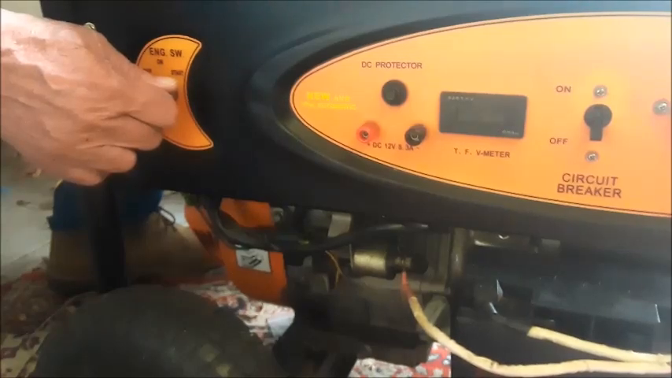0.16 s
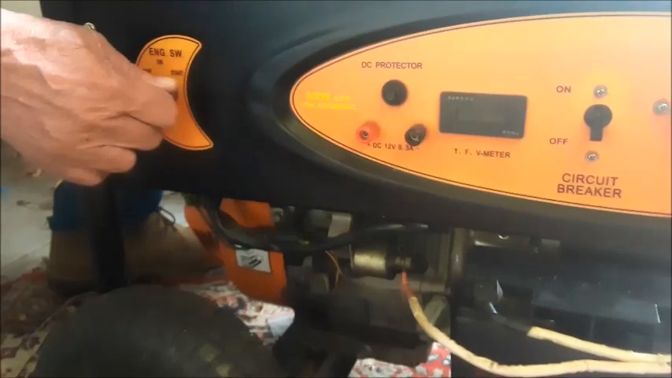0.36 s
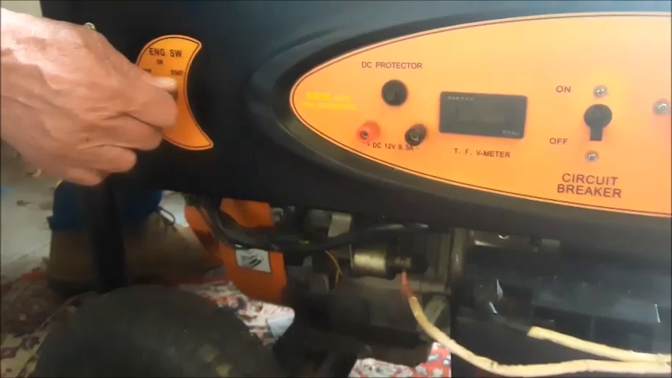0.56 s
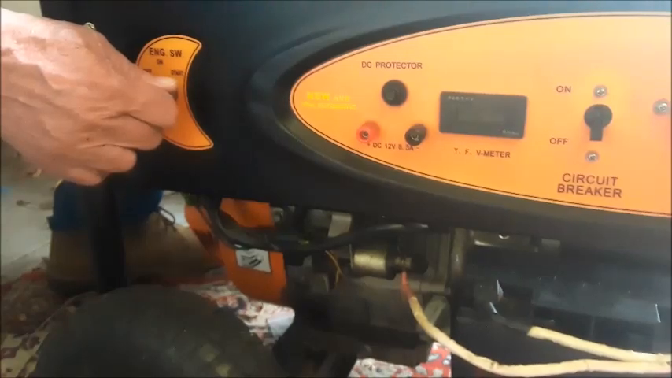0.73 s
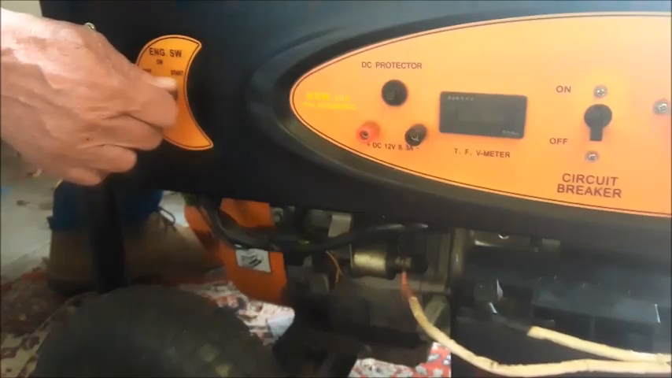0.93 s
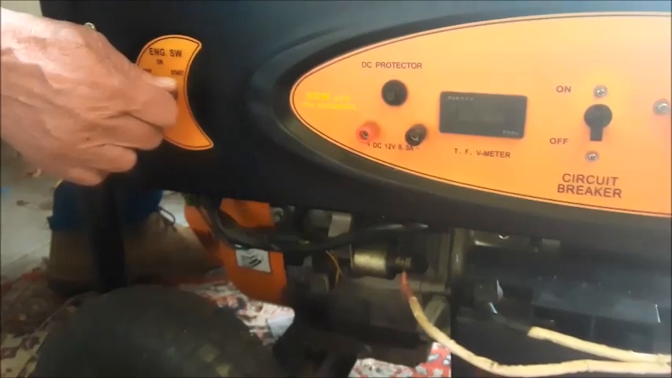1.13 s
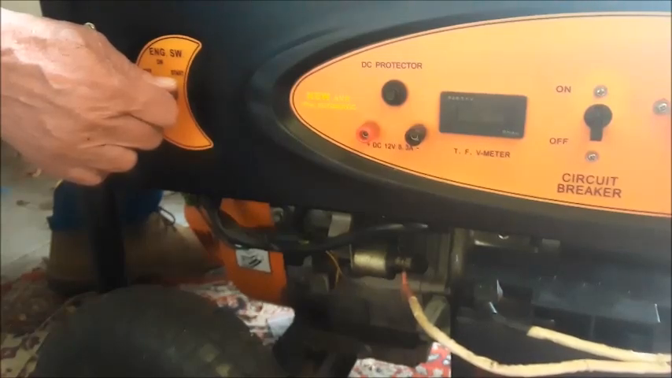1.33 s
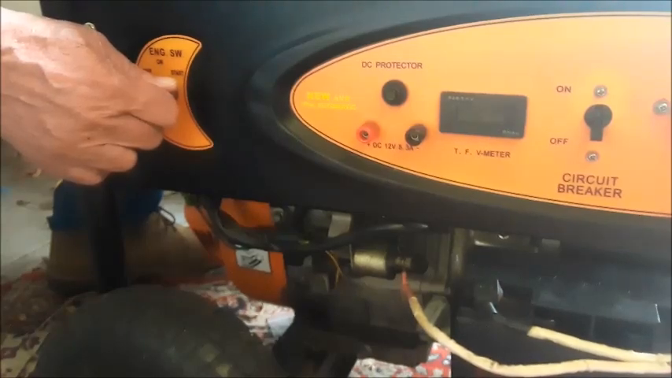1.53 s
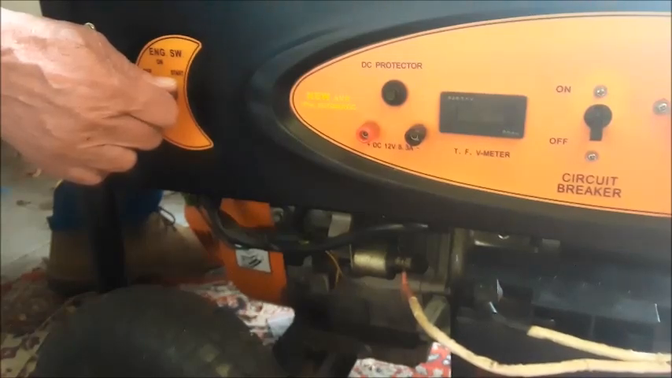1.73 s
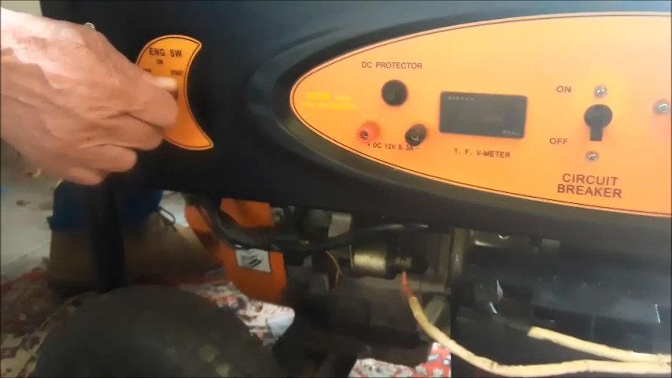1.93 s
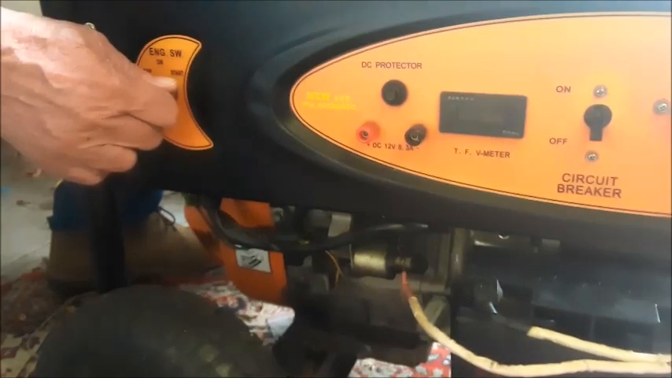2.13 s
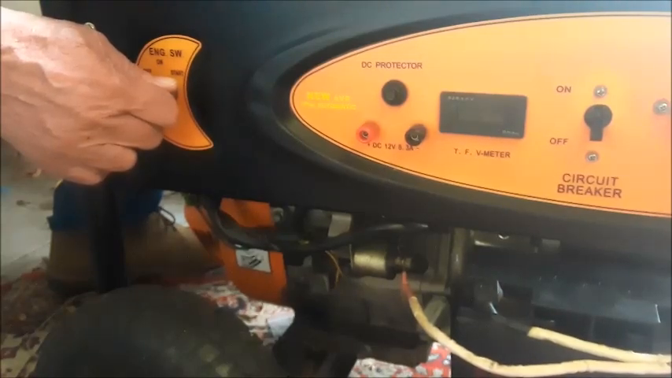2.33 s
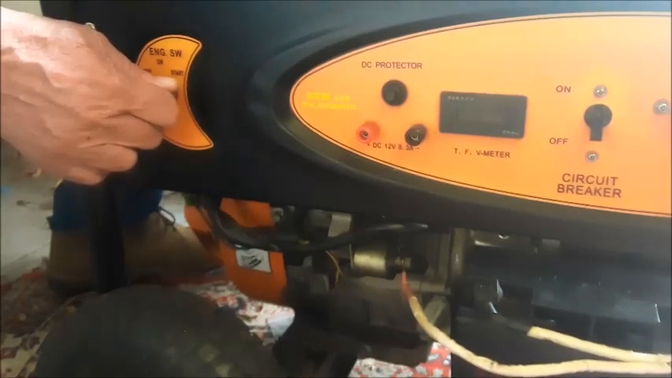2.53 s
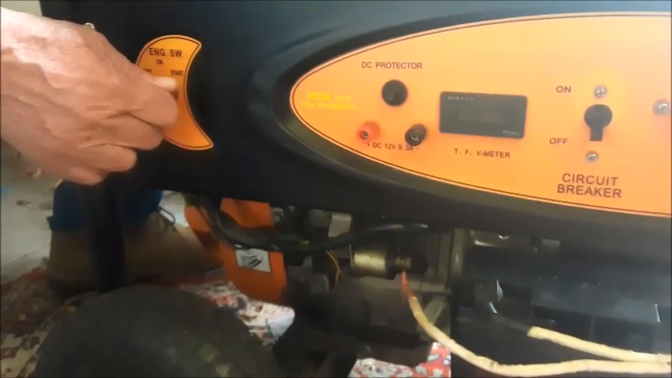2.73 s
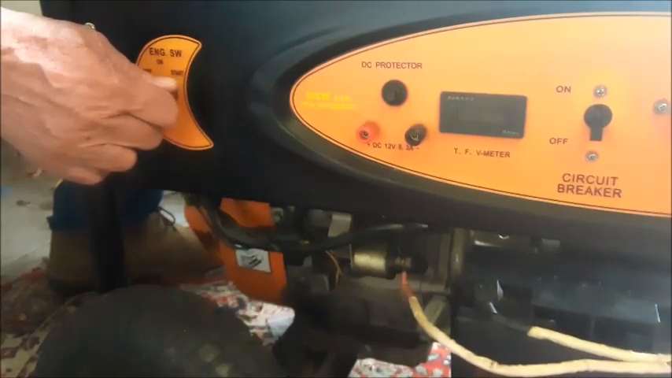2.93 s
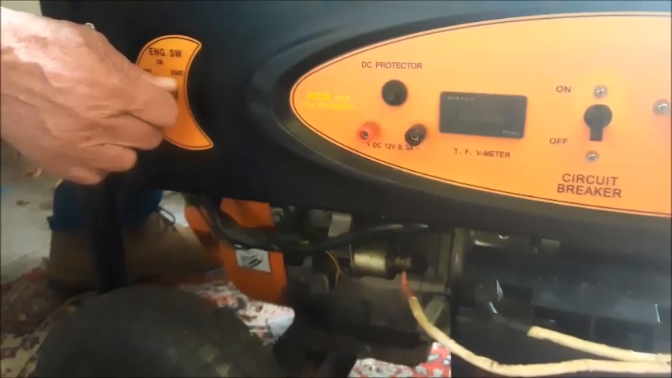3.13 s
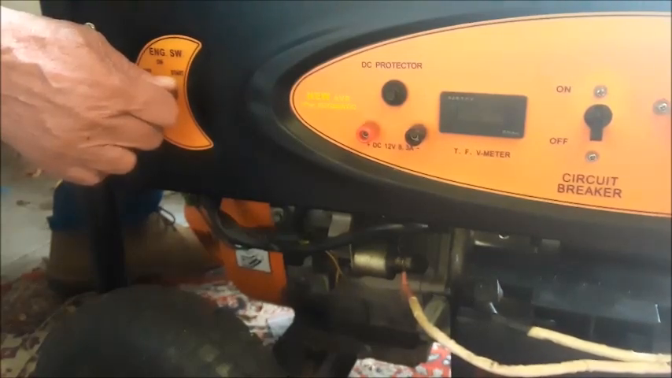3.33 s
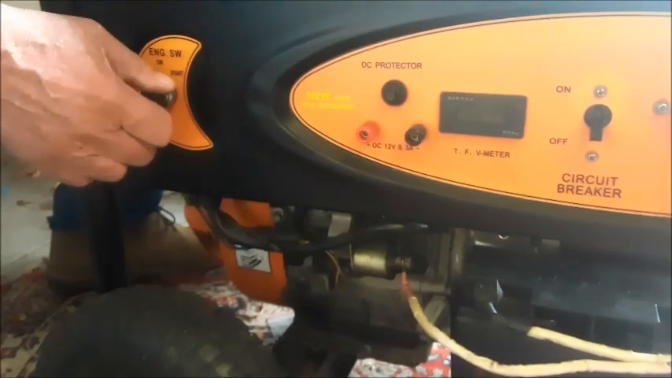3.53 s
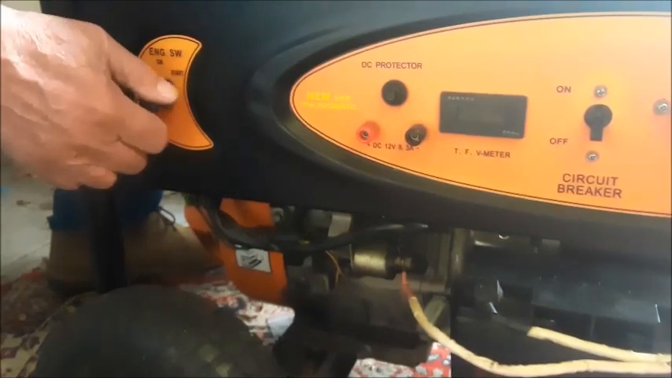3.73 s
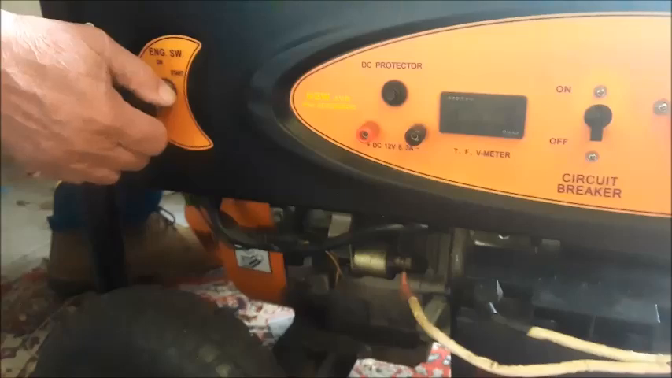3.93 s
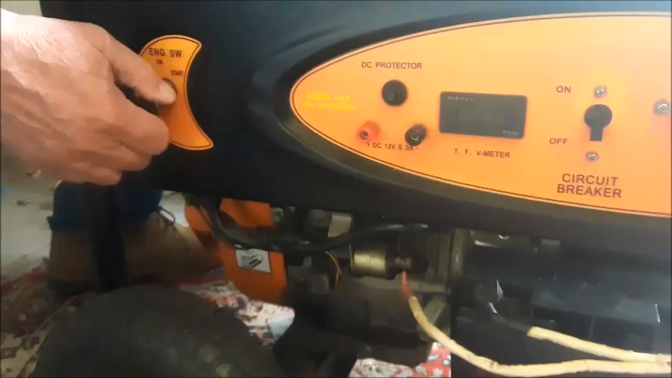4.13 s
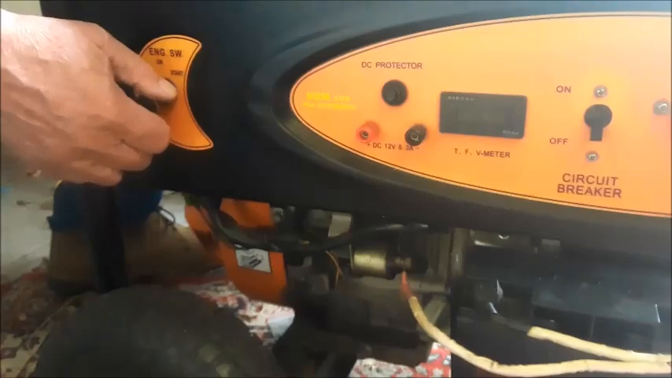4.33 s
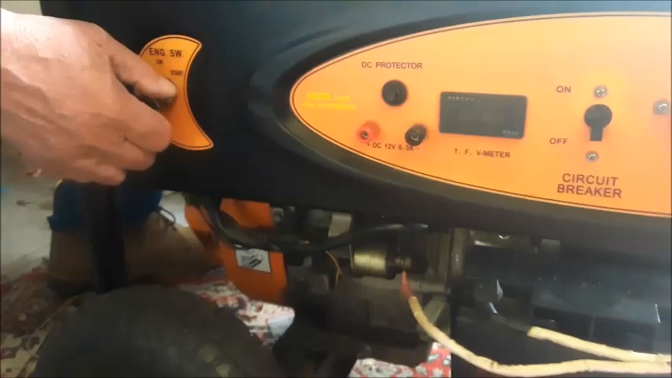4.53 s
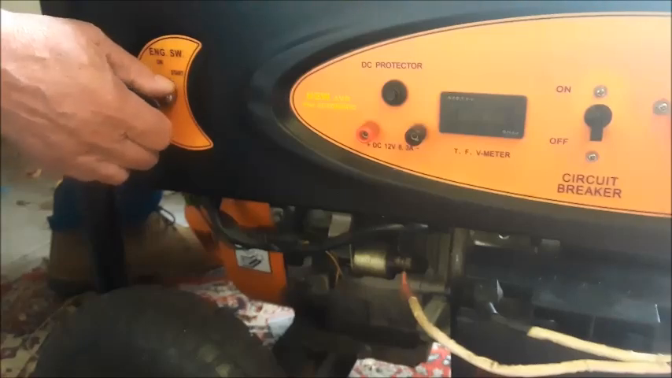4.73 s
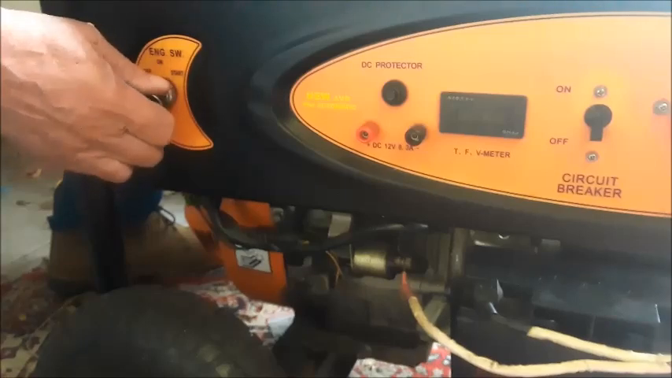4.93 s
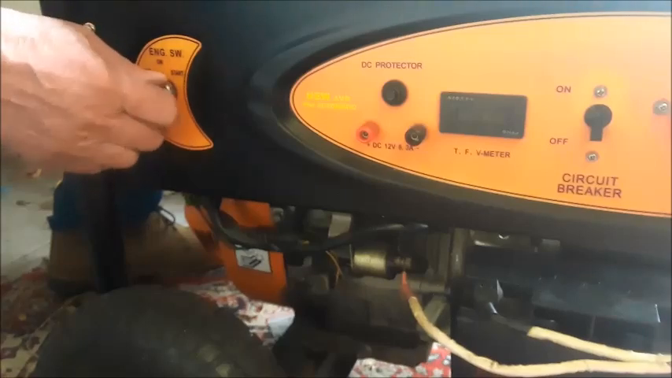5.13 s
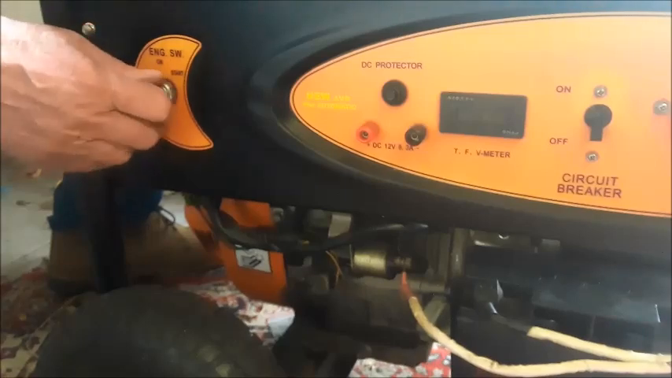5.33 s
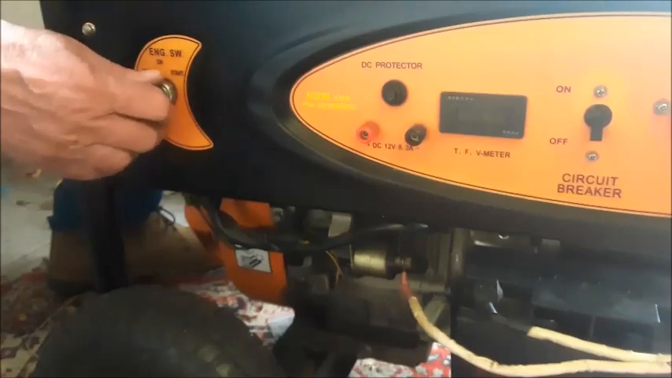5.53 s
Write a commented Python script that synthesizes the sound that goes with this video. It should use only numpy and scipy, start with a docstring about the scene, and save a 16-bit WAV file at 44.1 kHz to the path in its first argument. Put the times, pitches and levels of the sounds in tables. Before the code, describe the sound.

From the start an electric starter is already cranking a one-cylinder generator engine that does not catch. A harsh gear whine, mostly around 1.6 to 1.8 kHz with higher overtones, sags and recovers nearly four times a second as each compression brakes it. Casing and cover rattle and ring, gears grind, the frame rumbles low, and soft air thumps and small valve ticks repeat each cycle. The pace rises only slightly, and the whine's colour shifts around 1.3-2.1 s. At about 3.35 s the key lets go: a bright snap at 3.38 s, a brief sinking whir, then duller grinding and irregular short knocks, fading until about 4.2 s. Near silence follows with faint low noise. A sharp key-switch click comes at 4.76 s, tiny ticks around 5.05-5.15 s, and a stronger, fuller click at 5.61 s. The microphone is close; knocks and clicks have short tails from hard walls.

```python
"""A whining electric starter is heard first: it cranks a one-cylinder generator engine that does not catch.
The gear tones slow at each compression, over noise ringing in the casing and soft air pulses from the piston.
The key lets go, the engine clatters to rest with short knocks, and the key switch clicks twice.
One microphone listens close by in a small hard space; knocks and clicks get a short tail of noise from its walls."""
import sys
import numpy as np
from scipy import signal
from scipy.fft import rfft, irfft, next_fast_len
from scipy.io import wavfile
from scipy.ndimage import map_coordinates

SR = 44100
rng = np.random.default_rng(int(sys.argv[2]) if len(sys.argv) > 2 else 0)


def dump_mix(stems):
    """Bounce the given channels to the path in sys.argv[1] as a 16-bit WAV at rate SR."""
    frames = np.atleast_2d(stems).T  # one column per channel
    limited = np.clip(frames, -1, 1)  # hard clip at full scale
    pcm = np.round(limited * 32767).astype(np.int16)
    wavfile.write(sys.argv[1], SR, pcm)


N = 250047
T = np.arange(N) / SR  # time of each sample, s

RELEASE_S, COAST_S, REST_S = 3.345, 3.485, 4.19  # the key lets go, coasting starts, the crank stops


def amp(db):
    """Turn decibels into a plain multiplier."""
    return 10 ** (np.asarray(db) / 20)


def unit(x):
    """Scale x to rms 1."""
    return x / np.sqrt(np.mean(x ** 2) + 1e-20)


def along(points, hz):
    """Read a curve of (Hz, value) points on a log frequency axis."""
    point_hz, value = np.transpose(points)
    return np.interp(np.log(hz + 1), np.log(point_hz + 1), value)


def curves(rows, at=T):
    """Join the rows by straight lines into curves, one for each column after the first."""
    position, *columns = np.transpose(rows)
    return [np.interp(at, position, column) for column in columns]


def wobble(rate):
    """A smooth random curve with `rate` random points a second."""
    points = rng.standard_normal(int(N * rate / SR) + 4)
    return map_coordinates(points, [T * rate])


def filtered(x, response):
    """Pass x through a response that depends on frequency."""
    size = next_fast_len(len(x) + SR // 8)
    spectrum = rfft(x, size) * response(np.fft.rfftfreq(size, 1 / SR))
    return irfft(spectrum, size)[:len(x)]


def modes(table):
    """Resonances, as in a struck solid part; every other one has its sign flipped."""
    def response(f):
        total = 0
        for k, (center, width, db) in enumerate(table):
            damping = 1j * f * width
            total = total + (-1) ** k * amp(db) * damping / (center * center - f * f + damping)
        return total
    return response


def shaped(spectrum):
    """A filter that follows a spectrum given as (Hz, dB) points."""
    return lambda hz: amp(along(spectrum, hz))


def tilted(spectrum, slope_db):
    """A spectrum turned about 5 kHz by slope_db an octave, with no further turn below 1.5 kHz."""
    return lambda hz: amp(along(spectrum, hz) + slope_db * np.log2(np.maximum(hz, 1500) / 5000))


def noise(response, gate=1, size=N):
    """Random noise, gated, then filtered and scaled to rms 1."""
    return unit(filtered(gate * rng.standard_normal(size), response))


FIRST_S = 0.07  # s, first compression
PACE, PACE_GAIN = 3.788, 0.0364  # cycles a second at that moment, and its gain each second


def cycles(t):
    """Engine cycles since the first compression; the flywheel keeps the pace smooth."""
    since = t - FIRST_S
    return (PACE + PACE_GAIN * since / 2) * since


# Load changes lift five layers in every engine cycle.
# Each row: place as a share of the cycle, half width as a share, then lifts in dB for the whine at first,
# the whine later, the housing knocks, the deep rattle and the bright rattle.
SWELLS = [(.06, 0.05, 7, 12, -5.5, 5, 4), (.18, 0.053, 10, -1, 15, 3.5, 9),
          (.33, 0.064, -12.5, -8.5, 14.5, 0.5, 5.5), (.44, 0.12, 9.5, 0.5, 4, 1.5, -3),
          (.68, 0.13, 3.5, 7.5, 7, 1, 8.5), (.87, 0.067, 5, 6, 2.5, -1, 2)]
# The level between swells, in dB, for the same five layers in the same order.
REST_DB = (-4, -7.5, -5, -0.5, -2)


def swells(share):
    """The changing load sets the level of each layer by the place in the cycle."""
    at, half_width, *lifts = np.transpose(SWELLS)
    distance = (share[:, None] - at + .5) % 1 - .5  # the cycle wraps round
    bumps = np.exp(-(distance / half_width) ** 2)
    return [rest + bumps @ lift for rest, lift in zip(REST_DB, lifts)]


REST_FADE = 89  # dB/s, added to the fade once the crank stops


def coasting(db, fade):
    """A level held while cranking, sinking as the engine coasts and faster once it stands."""
    return db - fade * np.maximum(T - COAST_S, 0) - REST_FADE * np.maximum(T - REST_S, 0)


# Starter gear speed through one cycle, braked by compression.
# Each row: place as a share of the cycle, speed in teeth a cycle at first, the same later.
GEAR = [(0, 443, 465), (.07, 464, 465), (.18, 418, 416), (.25, 424, 434), (.35, 441, 439), (.55, 446, 446),
        (.72, 450, 454), (1, 480, 465)]


def gear_turning(share, late):
    """Compression brakes the gear; the tooth rate adds up to the angle of the tooth tone, in radians."""
    teeth, teeth_late = curves(GEAR, share)
    pace = PACE + PACE_GAIN * (T - FIRST_S)
    tooth_hz = (teeth + late * (teeth_late - teeth)) * pace
    return 2 * np.pi * np.cumsum(tooth_hz * (1 + 0.002 * wobble(70))) / SR


# Tones of the meshing gear teeth.
# Each row: pitch as a multiple of the tooth rate, level in dB at first, level in dB later,
# flutter in dB; the swells move these levels.
WHINE = [(1, -28.5, -25.5, -0.54), (.967, -38.5, -37, 4), (1.033, -44.5, -34.5, 3),
         (1.066, -43.5, -36.5, 1.5), (2, -29.5, -43, 2), (2.033, -39.5, -30, 1.5)]
# Resonances of the starter housing.
# Each row: pitch in Hz, width in Hz, relative level in dB.
HOUSING = [(1560, 23, 13.5), (1703.4, 24.4, 18), (1771.4, 16.3, 12.5), (1815, 31, 11)]


def gear_whine(tooth, late, engaged, first_db, late_db):
    """Meshing teeth make fluttering tones tied to gear speed, and the housing rings along."""
    tones = 0
    for multiple, db, end_db, flutter_db in WHINE:
        level_db = db + late * (end_db - db) + flutter_db * wobble(45)
        tones = tones + amp(level_db) * np.sin(multiple * tooth)
    whine = amp(first_db + late * (late_db - first_db)) * engaged * tones
    return whine + filtered(whine, modes(HOUSING))


# Resonances of the gearbox.
# Each row: pitch in Hz, width in Hz, relative level in dB.
GEARBOX = [(2104, 19, 2), (2286, 23.5, -2.5), (2486, 35, 5.5), (2511, 67, -1), (2686, 13, -0.5),
           (2962, 14, 5), (3128, 37, 2), (3306, 10, 5.5), (3575, 81, 0), (4457, 24, -4), (5160, 40, -4),
           (6210, 44, -15), (7000, 55, -2.5), (8390, 29, -5)]


def tooth_knocks(turn, knock_db):
    """Knocking teeth drive noise through the housing and gearbox resonances."""
    shake = amp(-22.5) * noise(modes(HOUSING), amp(knock_db) * turn)
    gears = amp(-27) * noise(modes(GEARBOX), turn)
    return shake + gears


STIR_DB, STIR_RISE_S, STIR_FADE = -5, 0.008, 278  # dB over a knock's body level, rise in s, fade in dB/s


def stirred():
    """How hard each stopping knock shakes the casing: a quick rise, then a fade."""
    total = 0
    for start, _, body_db, *_ in CLUNKS:
        since = np.maximum(T - start, 0)
        fade = amp(body_db + STIR_DB - STIR_FADE * since)
        total = total + fade * (1 - np.exp(-since / STIR_RISE_S))
    return total


# Deep resonances of the casing.
# Each row: pitch in Hz, width in Hz, relative level in dB.
DEEP = [(72, 14, -29), (104, 12, -25.5), (185.5, 12, -15.5), (309.7, 13, -10), (493.2, 12.6, -10),
        (667.3, 13, -2.5), (745.3, 23.7, -0.5)]
# Bright resonances of the cover.
# Each row: pitch in Hz, width in Hz, relative level in dB.
BRIGHT = [(968, 20, 5.5), (1204, 14, 0), (1385, 99, -4.5), (1505, 69, -12.5)]
RATTLE_DB, RATTLE_FADE = -29, 58  # base level in dB, fade in dB/s while coasting


def casing_rattle(turn, late, engaged, deep_db, bright_db):
    """The shaken casing and cover ring with noise; the stopping knocks stir them again."""
    deep = amp(deep_db * engaged - 0.5) * noise(modes(DEEP), turn)
    bright = amp(bright_db * engaged - 2.5) * noise(modes(BRIGHT), turn)
    level = amp(coasting(RATTLE_DB, RATTLE_FADE) + 0.52 * (2 - late))
    return (level + stirred()) * (deep + bright)


# Noise spectrum of the gear and brushes.
# Each row: frequency in Hz, relative level in dB per Hz.
GRIND = [(24, -70.5), (40, -25.5), (312, -28), (422, -22), (751, -7), (852, -12), (965, -12), (1090, -18.5),
         (1720, -5.5), (2000, -10), (3560, -13.5), (7000, -16), (9220, -29), (11000, -22), (16000, -24.5)]
GRIND_DB, GRIND_FADE = -22.5, 77  # base level in dB, fade in dB/s while coasting
LOAD_DB = 2  # dB, the grind is louder while the gear is engaged
DULL_FROM_S, DULL_TO_S = 3.41, 3.916  # the slowing gear loses its treble


def gear_grind(engaged):
    """Gear and brushes scrape as noise, which blends into a duller copy as the gear slows."""
    sharp = noise(shaped(GRIND))
    blunt = filtered(sharp, tilted([(1, -2)], -8))
    dull = np.interp(T, [DULL_FROM_S, DULL_TO_S], [0, .9])
    level_db = coasting(GRIND_DB, GRIND_FADE) + LOAD_DB * engaged + 0.612 * wobble(30)
    return amp(level_db) * ((1 - dull) * sharp + dull * blunt)


# Noise spectrum of the frame on the ground.
# Each row: frequency in Hz, relative level in dB per Hz.
RUMBLE = [(18, -50), (30, -21.5), (129, -15.5), (178, 2.5), (220, -13.5), (303, -0.5), (350, -5.5),
          (460, -37), (770, -120)]
RUMBLE_DB, RUMBLE_FADE = -47.5, 13  # base level in dB, fade in dB/s while coasting


def frame_rumble():
    """The frame shakes on the ground as low noise that wavers in level."""
    level_db = coasting(RUMBLE_DB, RUMBLE_FADE) + 1.8 * wobble(14)
    return amp(level_db) * noise(shaped(RUMBLE))


# Over this time the gear comes to recover more slowly from compression; the cranking pace still rises slightly.
SETTLE_FROM_S, SETTLE_TO_S = 1.3, 2.1


def starter():
    """Whine, knocks and rattle follow the engine cycle, over grind and rumble."""
    share = cycles(T) % 1  # place in the cycle, 0 to 1
    late = np.interp(T, [SETTLE_FROM_S, SETTLE_TO_S], [0, 1])  # blends from "at first" to "later"
    engaged = 1 / (1 + np.exp((T - RELEASE_S) / 0.017))  # 1 in gear, 0 when freed
    first_db, late_db, knock_db, deep_db, bright_db = swells(share)
    tooth = gear_turning(share, late)
    turn = 1 + .5 * np.cos(tooth / 30)  # the armature beats once a turn of 30 teeth
    whine = gear_whine(tooth, late, engaged, first_db, late_db)
    knocking = engaged * tooth_knocks(turn, knock_db)
    rattle = casing_rattle(turn, late, engaged, deep_db, bright_db)
    return whine + knocking + rattle + gear_grind(engaged) + frame_rumble()


# Air pulses in each cycle.
# Each row: place as a share of the cycle, pitch in Hz at the pulse's middle, pitch rise in Hz a second,
# relative level in dB, half length in seconds.
THUMPS = [(.04, 175, -0.5, -7, 0.0077), (.52, 150, 1300.5, -14, 0.016), (0.2, 75, -1.5, -22.5, 0.042),
          (0.61, 120, 0, -16, 0.01), (.86, 100, -2, -17, .012)]
THUMP_DB, TICK_DB = -25.5, -26  # average base levels
STROKE_SCATTER_DB = 1.2  # random spread from cycle to cycle


def piston():
    """The piston pushes air in short low pulses and a valve ticks, at set places in each cycle."""
    out, t = np.zeros(N + SR), T[:SR // 5]
    starts = np.interp(np.arange(int(cycles(COAST_S)) + 3), cycles(T), T)
    u = t - .07  # time from the middle of a pulse
    for start, after in zip(starts, starts[1:]):
        thump_db, tick_db = rng.normal([THUMP_DB, TICK_DB], STROKE_SCATTER_DB)
        for share, hz, rise, db, half in THUMPS:
            at = start + share * (after - start)
            swell = amp(thump_db + db) * np.exp(-(u / half) ** 2)
            pulse = swell * np.sin(2 * np.pi * (hz * u + rise * u * u / 2))
            if at < COAST_S + .03:
                out[round((at - .07) * SR):][:len(t)] += pulse
        tick = noise(modes([(7920, 780, -3), (5280, 1200, -6.5)]), size=len(t)) * amp(-60 * t / 0.16)
        if start < RELEASE_S:
            out[round((start + .13 * (after - start)) * SR):][:len(t)] += amp(tick_db) * tick
    return out[:N]


# Levels of faint noise between and under the knocks and clicks.
# Each row: time in seconds, base level of the low noise in dB, level of the high noise in dB.
FAINT_LEVELS = [(4.2, -58, -59.5), (4.34, -65, -83), (4.64, -73, -87), (4.75, -64, -69), (4.8, -58, -54),
                (4.92, -66, -59), (5.0, -73, -80), (5.14, -65, -85.5), (5.24, -84, -89), (5.36, -75, -86),
                (5.44, -68.5, -75), (5.67, -61.5, -81)]
# Spectrum of the low noise.
# Each row: frequency in Hz, relative level in dB per Hz.
LOW = [(25, -27.5), (60, -8), (100, -1), (140, -17.5), (250, -13), (450, -7.5), (650, -14), (1000, -26),
       (2500, -44.5), (5000, -100)]
# Spectrum of the high noise.
# Each row: frequency in Hz, relative level in dB per Hz.
HIGH = [(1500, -21.5), (3000, -8), (7000, 2), (8500, -14.5), (16000, -13)]
# Faint fuzzy tones.
# Each row: start in seconds, time in seconds shortly before it has faded out, pitch in Hz, width in Hz,
# level in dB at full swell.
TONES = [(4.455, 4.75, 97, 9.3, -64.5), (4.777, 5.1, 74.9, 6.6, -65), (4.3, 4.6, 1280, 58, -79),
         (4.35, 4.42, 1624, 90, -74), (4.8, 5.15, 3500, 18, -73), (5.37, 5.669, 1357, 35, -70),
         (5.38, 5.67, 2240, 60, -79), (5.42, 5.676, 1590, 40, -80)]


def faint_noise():
    """Low and high noise swell with the clicks and sink between them; faint tones are narrow-band noise."""
    low_db, high_db = curves(FAINT_LEVELS)
    low = amp(low_db + 1.5 * wobble(22)) * noise(shaped(LOW))
    faint = low + amp(high_db) * noise(shaped(HIGH))
    for start, end, hz, width, db in TONES:
        swell = np.clip(np.minimum(T - start, end - T + 0.041) / 0.11, 0, 1)
        faint = faint + amp(db) * swell * noise(modes([(hz, width, 0)]))
    return faint


def microphone_hiss():
    """The microphone's own steady hiss, weaker toward the treble, at -90 dB."""
    return amp(-90) * noise(lambda hz: 1 / np.sqrt(hz + 3000))


# How the small hard space dies away.
# Each row: frequency in Hz, time in seconds to fall by 60 dB.
ROOM = [(200, 0.99), (530, 0.14), (1400, 0.37), (3700, 0.26), (10000, 0.19)]


def room():
    """The walls answer with a fresh noise tail of energy 1; each frequency dies at its own speed."""
    hz, t, bands = signal.stft(rng.standard_normal(SR // 2), SR, nperseg=128)
    fading = bands * amp(-60 * t / along(ROOM, hz)[:, None])
    tail = signal.istft(fading, SR, nperseg=128)[1][:SR // 2]
    return tail / np.linalg.norm(tail)


def knocks(events, snap, body, wet_db):
    """Each knock is a short bright snap and a blow on the body's modes, with the walls' answer."""
    out, t = np.zeros(N + SR), T[:SR // 2]
    for start, snap_db, body_db, length, tilt_db in events:
        burst = amp(-60 * t / length) * rng.standard_normal(len(t))
        burst = burst + amp(wet_db) * np.linalg.norm(burst) * room()
        burst = burst + 1.09 * amp(-60 * t / 0.0029) * rng.standard_normal(len(t))  # first contact
        crack = filtered(burst, tilted(snap, tilt_db))
        blow = filtered(burst, modes(body))
        both = amp(snap_db) * crack / np.abs(crack).max() + amp(body_db) * blow / np.abs(blow).max()
        out[round(start * SR):][:len(t)] += both * (1 - np.exp(-t / 0.00079))  # soft onset
    return out[:N]


# Parts knock as the engine stops.
# Each row: start in seconds, snap level in dB, body level in dB, time in seconds for the burst to fall
# by 60 dB, treble tilt of the snap in dB an octave.
CLUNKS = [(3.3795, -3, -34, .012, 0), (3.395, -20, -42, .03, -4.5), (3.676, -36.5, -20.5, .017, -5),
          (3.714, -21, -25, 0.04, -16), (3.783, -28.5, -49, .036, -1.5), (3.82, -31, -29.5, .025, -9),
          (3.887, -24.5, -23.5, .023, -14.5), (3.905, -41, -31, 0.01, -8), (3.979, -35, -37, 0.021, -6),
          (4.126, -36.5, -53.5, 0.033, 3.5), (4.172, -43, -54.5, .029, 5)]
# Noise spectrum of the snap.
# Each row: frequency in Hz, relative level in dB per Hz.
CLUNK_SNAP = [(500, -80), (1200, -34.5), (2000, -2.5), (3300, 5.5), (5300, 4.5), (7000, 8.5), (9000, -8),
              (10600, 2.5), (16000, -9.5)]
# Resonances of the knocked body.
# Each row: pitch in Hz, width in Hz, relative level in dB.
CLUNK_BODY = [(706, 94, -2.5), (980, 84, -4), (1340, 100, -6.5), (1576, 36, 4)]


def stopping_knocks():
    """Engine parts knock and ring as they come to rest."""
    return knocks(CLUNKS, CLUNK_SNAP, CLUNK_BODY, wet_db=8.5)


# The freed pinion rings, then the armature whirs down.
# Each row: start in seconds, time held in seconds, pitch in Hz, sinking in Hz a second, base level in dB.
WHIRS = [(3.39, .035, 1374, 1203, -21), (3.42, 0.18, 830, 1150, -33.5)]
WHIR_RISE, WHIR_FADE = 1500, 220  # dB/s


def spin_down():
    """The freed pinion and armature slow down: two rough tones sink in pitch and fade."""
    out = 0
    for start, held, hz, sinks, db in WHIRS:
        rise_db = WHIR_RISE * np.maximum(start - T, 0)
        fade_db = WHIR_FADE * np.maximum(T - start - held, 0)
        level_db = db - rise_db - fade_db
        pitch = np.maximum(hz - sinks * np.maximum(T - start, 0), 0)
        pitch = pitch * (1 + 0.021 * wobble(80))
        out = out + amp(level_db + 3 * wobble(60)) * np.sin(2 * np.pi * np.cumsum(pitch) / SR)
    return out


# Two strong switch clicks and small ticks of the key.
# Each row: start in seconds, snap level in dB, panel level in dB, time in seconds for the burst to fall
# by 60 dB, treble tilt of the snap in dB an octave.
KEY = [(4.580, -61, -65, 0.018, -1), (4.7565, -5, -28, 0.02, 1), (5.035, -51, -55, .015, 5),
       (5.052, -34.5, -49, .008, 4), (5.105, -37, -49.5, .006, 7.5), (5.125, -65, -55, .02, -2),
       (5.152, -66.5, -56, .015, 4), (5.613, -4, -17, 0.048, 3.5)]
# Noise spectrum of the snap.
# Each row: frequency in Hz, relative level in dB per Hz.
KEY_SNAP = [(410, -24), (700, 1), (984, -9.5), (1050, -28), (1210, -9.5), (1800, -7.5), (2080, -11),
            (3790, -3.5), (4320, -8), (4800, -5), (6740, -1.5), (8990, -18), (10300, -10), (15000, -13),
            (16000, -7)]
# Resonances of the panel.
# Each row: pitch in Hz, width in Hz, relative level in dB.
PANEL = [(200, 43, -24.5), (384.4, 34, -2), (492.5, 54, -2.5), (710, 56, -2.5)]


def key_clicks():
    """The key switch snaps and its panel rings."""
    return knocks(KEY, KEY_SNAP, PANEL, wet_db=7.5)


def scene():
    """Mix all sources; both channels carry the same sound."""
    engine = starter() + piston() + stopping_knocks() + spin_down()
    mono = engine + faint_noise() + microphone_hiss() + key_clicks()
    return np.array([mono, mono])


TOP_HZ = 15850  # band limit


def record(dry):
    """Bass rolls off in the microphone; nothing is kept above the band limit."""
    def response(hz):
        edge = np.clip((TOP_HZ - hz) / 200, 0, 1) ** 2
        return edge / (1 + (45 / (hz + 1)) ** 4)
    return np.array([filtered(channel, response) for channel in dry])


dry = scene()
out = record(dry)
dump_mix(out)
```